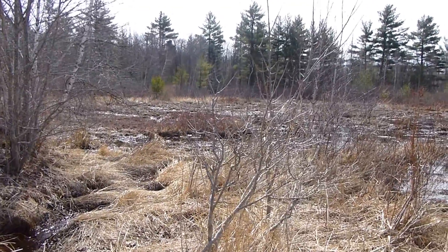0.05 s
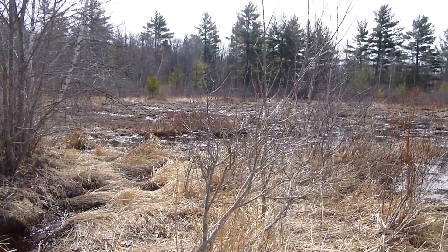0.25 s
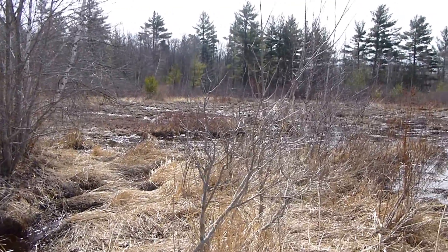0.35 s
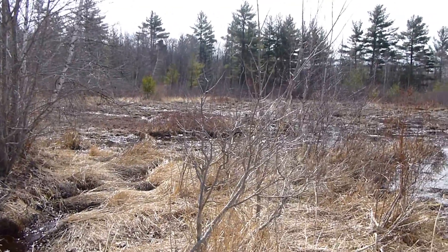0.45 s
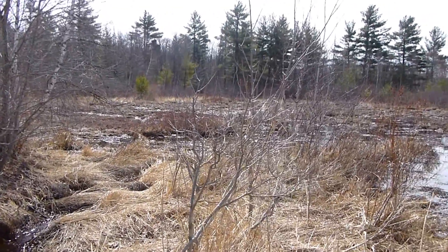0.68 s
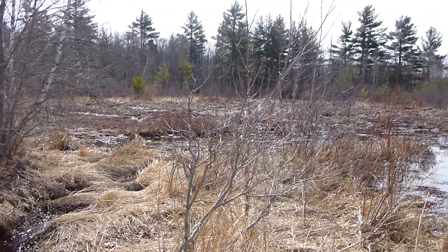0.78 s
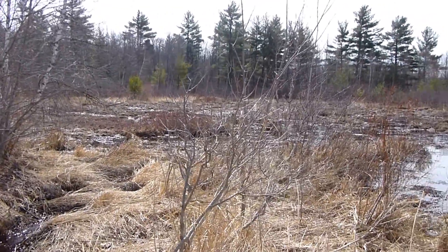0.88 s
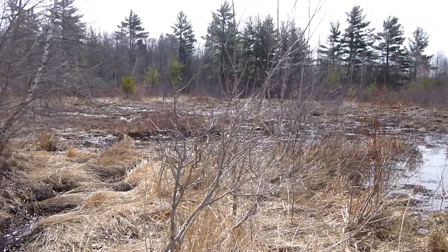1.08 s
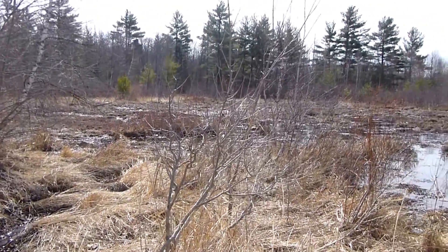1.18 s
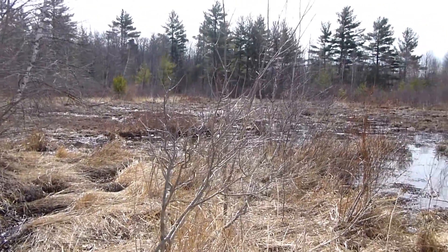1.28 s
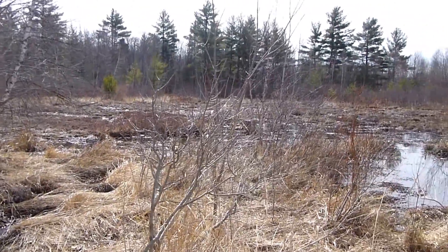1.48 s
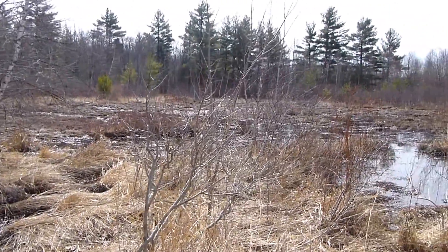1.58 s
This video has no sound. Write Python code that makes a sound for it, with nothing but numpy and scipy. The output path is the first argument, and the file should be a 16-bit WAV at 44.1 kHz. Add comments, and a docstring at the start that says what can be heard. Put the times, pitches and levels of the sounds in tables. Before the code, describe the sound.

Small frogs trill in a marsh, slightly to the right, over soft wind and hiss. A high frog gives quick tiny peeps until about 0.4 seconds. A nearer, lower frog takes over, its pulsed trill climbing in pitch, loudest around 1 second and ending near 1.5. A buzzy frog overlaps from about 1.1 seconds, and faint distant peeps follow from 1.4 to 1.7, all with a slight echo.

```python
"""At the edge of a marsh, spring peepers (tiny frogs) trill a little to the right, over soft wind and hiss.
Each trill is a run of short notes that climb in pitch; each note is a push of air that rings a throat sac.
A high frog hands over to a near, lower one, then a buzzy rival and a far frog join in.
Reeds and trees return a faint echo."""
import sys
import numpy as np
from scipy import signal
from scipy.io import wavfile
from scipy.ndimage import uniform_filter1d

SR = 44100
rng = np.random.default_rng(int(sys.argv[2]) if len(sys.argv) > 2 else 0)


def digitize_waveform(pressure):
    """Quantize a signal to 16-bit integers and store it at the path in sys.argv[1].

    Rows of a 2-D input are taken as channels; values are limited to [-1, 1].
    """
    field = np.atleast_2d(pressure).T
    bounded = np.clip(field, -1, 1)
    quanta = np.round(bounded * 32767).astype(np.int16)
    wavfile.write(sys.argv[1], SR, quanta)


N = 72765


def amp(db):
    """Turns decibels into a number to multiply by."""
    return 10 ** (np.asarray(db) / 20)


def evened(x):
    """Scales a signal so that its average size (rms) is 1."""
    return x / np.sqrt(np.mean(abs(x) ** 2) + 1e-20)


def curve_at(points, hz):
    """Reads between the rows of a (frequency, value) table, with octaves evenly spaced."""
    freqs, values = np.transpose(points)
    return np.interp(np.log(hz + 1), np.log(freqs), values)


def lag(x, seconds):
    """Smooths a signal so that it follows changes a little late."""
    memory = np.exp(-1 / (seconds * SR))
    return signal.lfilter([1 - memory], [1, -memory], x)


def wander(count, size):
    """A smooth random drift; a larger size makes it slower."""
    return evened(uniform_filter1d(uniform_filter1d(rng.standard_normal(count), size), size))


def air():
    """Soft wind in the trees, hiss and the blur of a distant chorus, all made by shaping noise."""
    # tone of the wind and hiss: (frequency [Hz], relative level [dB])
    tone = [(20, -2), (60, -10), (100, -7.5), (150, 0), (250, -1), (500, -1.5), (900, 0), (1250, 1),
            (1550, -5.5), (2500, -8.5), (4000, -13), (5000, -10.5), (7000, -13), (10500, -16),
            (14000, -20.5), (15500, -28.5)]
    # how alike the two ears are: (frequency [Hz], likeness [-1 to 1])
    likeness = [(30, -0.25), (130, 0.92), (300, 0.41), (600, -0.2), (1200, -0.68), (2200, -0.19),
                (4000, 0.28), (6000, 0.14), (9000, 0.47), (15000, 0.6)]
    # which side is louder: (frequency [Hz], left minus right [dB])
    balance = [(40, -1), (170, 2), (400, 2), (900, 0), (2000, 0), (15000, 0)]
    frame, hop = 1024, 256  # the noise is a grid of frequencies by moments, hop samples apart
    hz = np.fft.rfftfreq(frame, 1 / SR)
    t = np.arange(N // hop + 5) * hop / SR
    grid = (len(hz), len(t))
    left, other = rng.standard_normal((2, *grid)) + 1j * rng.standard_normal((2, *grid))
    alike = np.clip(curve_at(likeness, hz), -1, 1)[:, None]
    right = alike * left + np.sqrt(1 - alike ** 2) * other
    chorus_db = 2.5 * np.exp(-.5 * ((hz - 3200) / 420) ** 2)  # a hump around 3200 Hz
    pan_db = np.array([[.5], [-.5]]) * curve_at(balance, hz)
    steady_db = curve_at(tone, hz) + chorus_db + pan_db
    patches = uniform_filter1d(rng.standard_normal(grid), size=10, axis=0)
    flicker_db = .5 * evened(uniform_filter1d(patches, size=14, axis=1))
    gust_db = 4 * np.exp(-t / .35) / (1 + (hz[:, None] / 610) ** 2)  # a low gust that dies away
    shaped = np.array([left, right]) * amp(steady_db[:, :, None] + flicker_db + gust_db)
    _, noise = signal.istft(shaped, nperseg=frame, noverlap=frame - hop)
    return amp(-56) * evened(noise[:, :N])


def peep(length, hz, level_db, stutter, buzz, glide_hz, voice, count=4096):
    """One push of air: the throat sac rings an almost pure tone, with buzz, a weak overtone and hiss."""
    attack_s, release_s, sac_ring_s, slip_gap_s = .003, .0022, .0006, .005
    waver_hz, hiss_hz, hiss_ring_s = 7.2, 3683, .00019
    t = np.arange(count) / SR
    progress = np.minimum(t / length, 1)
    ends = (2 * progress - 1) ** 2  # 1 at both ends of the note, 0 in the middle
    opening = np.sin(np.pi / 2 * np.minimum(t / attack_s, 1)) ** 2
    push = opening * amp(-8 * ends) * np.exp(-np.maximum(t - length, 0) / release_s)
    # in a stuttering note the wave keeps slipping out of step
    slip_number = (t / slip_gap_s + rng.random()).astype(int)
    slips = np.pi * stutter * rng.uniform(-1.25, 1.25, count)[slip_number]
    rasp = amp(-32.5) * (wander(count, size=20) + 1j * wander(count, size=20))
    sac = lag(push * np.exp(1j * slips), sac_ring_s) * (1 + rasp)
    arch = voice["arch"] * (.2 - ends)  # bends the middle of the note up (down if negative)
    pitch = hz * (1 + arch) + glide_hz * (progress - .5) + waver_hz * wander(count, size=200)
    phase = 2 * np.pi * np.cumsum(pitch) / SR
    # buzz is a tone above the pitch and a weaker one below, each buzz_step times the pitch away
    beat = voice["buzz_step"] * phase + 2 * np.pi * rng.random() + .5 * wander(count, size=120)
    side_tones = buzz * (np.exp(1j * beat) + amp(voice["lower_db"]) * np.exp(-1j * beat))
    # the overtone lies at 1.5 times the pitch; the throat boosts it near 3326 Hz
    throat_db = 12.5 * np.exp(-((1.5 * hz - 3326) / 135) ** 2)
    overtone = amp(voice["overtone_db"] + throat_db) * np.exp(.5j * phase)
    tone = sac * np.exp(1j * phase) * (1 + side_tones + overtone)
    # swirling air hisses in the voice box
    noise = rng.standard_normal(count) + 1j * rng.standard_normal(count)
    swirl = evened(lag(lag(noise, hiss_ring_s), hiss_ring_s))
    hiss = amp(voice["hiss_db"]) * push * swirl * np.exp(2j * np.pi * hiss_hz * t)
    return amp(level_db) * np.sqrt(2) * (tone + hiss).real


def marsh_echo(sound):
    """Quick scatter from the reeds, then a long faint tail from the trees, different at each ear."""
    t = np.arange(SR) / SR
    reeds = amp(-11) * np.exp(-t / .028)
    trees = amp(-60 * t / .92)  # falls 60 dB in 0.92 s
    fade_in = np.minimum(t / .0041, 1)
    tail = rng.standard_normal((2, SR)) * fade_in * (reeds + trees)
    return signal.fftconvolve(sound[None], tail / np.linalg.norm(tail[0]), axes=1)[:, :N]


def trill(notes, voice, pan_db, echo_db):
    """One frog's run of peeps with its echo; pan_db is the left level minus the right."""
    peeps = np.zeros(N)
    for start, *settings in notes:
        sound = peep(*settings, voice)
        slot = peeps[round(start * SR):][:len(sound)]
        slot += sound[:len(slot)]
    sides = amp(np.array([[.5], [-.5]]) * pan_db)
    sides /= sides.mean()
    return sides * peeps + np.sqrt(sides) * amp(echo_db) * marsh_echo(peeps)


def high_frog():
    """A high frog opens with quick, tiny peeps."""
    # (start [s], length [s], pitch [Hz], level [dB], stutter [0-1], buzz [0-1], glide [Hz])
    notes = [ (.009, .012, 3062, -45.5, .03, 0.074, -18), (.048, 0.0097, 3060, -44.5, 0.055, 0.049, -26),
             (.087, 0.015, 3050, -44.5, 0.066, 0.027, -20), (.123, .014, 3030, -43.5, .1, 0.025, 115),
             (.165, 0.0085, 3147, -42.5, .05, .06, -56), (.203, 0.012, 3100, -38.5, 0.028, 0.022, 10),
             (.243, 0.0082, 3210, -40.5, 0.16, .04, -160), (.283, .012, 3194, -39.5, 0.18, 0.056, 36),
             (.322, .011, 3262, -39, 0.22, .03, 0), (.352, 0.011, 3353, -49, 0.5, 0.24, 4),
             (.360, 0.022, 3348, -38, .05, 0.033, 80), (.411, 0.0058, 3340, -41.5, 0.09, .03, -130)]
    voice = dict(overtone_db=-36, buzz_step=.19, lower_db=-8, hiss_db=-21, arch=-.0087)
    return trill(notes, voice, pan_db=-8, echo_db=-13)


def near_frog():
    """A near, lower frog sings a long trill that grows louder and clearer."""
    # (start [s], length [s], pitch [Hz], level [dB], stutter [0-1], buzz [0-1], glide [Hz])
    notes = [ (.111, .005, 2200, -54, .6, .1, 0), (.268, .012, 2130, -51, .3, .1, 0),
             (.329, .011, 2170, -47, .3, .1, 0), (.383, .012, 2190, -45, .9, .1, -60),
             (.438, .019, 2150, -41, .45, .05, 30), (.491, .018, 2160, -40, .05, .02, -30),
             (.546, .018, 2185, -40, .2, .03, -10), (.602, .021, 2205, -39, .03, .01, -10),
             (.660, .015, 2205, -40, .7, .05, 0), (.713, .019, 2245, -39, .03, .01, -25),
             (.764, .022, 2322, -36, .05, .1, 55), (.826, .021, 2305, -34.5, .02, .005, -30),
             (.881, .023, 2318, -31.5, .02, .005, -10), (.939, .026, 2345, -31, .02, .005, -5),
             (.999, .029, 2372, -30, .02, .005, -5), (1.062, .025, 2395, -31, .1, .01, 0),
             (1.124, .027, 2435, -31, .05, .005, -45), (1.191, .025, 2460, -33, .03, .005, -35),
             (1.257, .024, 2505, -32, 0, 0, 5), (1.319, .033, 2530, -32.3, 0, 0, 10),
             (1.387, .028, 2560, -33, .05, .02, -10), (1.465, .030, 2525, -34, 0, .06, 15)]
    voice = dict(overtone_db=-29, buzz_step=.245, lower_db=-3, hiss_db=-37, arch=.013)
    return trill(notes, voice, pan_db=-5.5, echo_db=-13)


def rival_frog():
    """A rival cuts in; strong side tones make it buzz."""
    # (start [s], length [s], pitch [Hz], level [dB], stutter [0-1], buzz [0-1], glide [Hz])
    notes = [ (1.053, .020, 2440, -49, .05, .25, 0), (1.112, 0.017, 2560, -41.5, 0.087, .25, 26),
             (1.155, 0.016, 2472, -42, 0.13, 0.11, -5), (1.171, 0.024, 2598, -41, 0.12, 0.23, 40),
             (1.222, 0.024, 2650, -40, 0.068, 0.17, 9), (1.281, 0.022, 2665, -40.5, 0.19, 0.29, -32),
             (1.336, 0.02, 2646, -45, 0.16, 0.61, 2), (1.397, 0.042, 2601, -44, 0.71, 0.27, -52),
             (1.453, 0.018, 2700, -44.5, 0.53, 0.54, -4), (1.545, 0.025, 2550, -59, 0.22, 0.17, 0)]
    voice = dict(overtone_db=-32, buzz_step=.18, lower_db=-6, hiss_db=-27, arch=.025)
    return trill(notes, voice, pan_db=-7, echo_db=-3.5)


def far_frog():
    """A far frog adds a few faint peeps, more echo than direct sound."""
    # (start [s], length [s], pitch [Hz], level [dB], stutter [0-1], buzz [0-1], glide [Hz])
    notes = [ (1.390, 0.015, 3230, -50.5, 0.23, .05, 0), (1.444, .020, 3194, -54.5, 0.37, 0.054, 0),
             (1.508, 0.025, 3200, -53, 0.62, 0.035, 0), (1.571, 0.01, 3225, -51, 0.094, 0.039, 0),
             (1.627, 0.029, 3244, -49.5, 0, 0.17, 0.0042)]
    voice = dict(overtone_db=-28, buzz_step=.138, lower_db=-12, hiss_db=-15.5, arch=.005)
    return trill(notes, voice, pan_db=-8, echo_db=2)


def scene():
    """Four frogs over the air of the marsh."""
    return air() + high_frog() + near_frog() + rival_frog() + far_frog()


def record(dry):
    """Cuts away the very highest treble, above 15500 Hz."""
    treble_cut = signal.firwin(511, 15500, window=("kaiser", 9), fs=SR)
    return signal.oaconvolve(dry, treble_cut[None], "same")


dry = scene()
out = record(dry)
digitize_waveform(out)
```